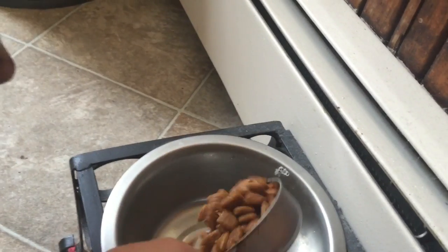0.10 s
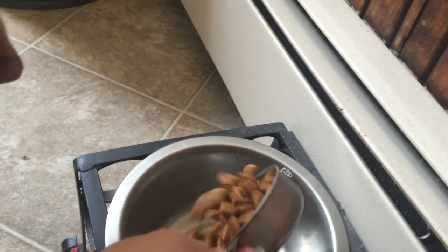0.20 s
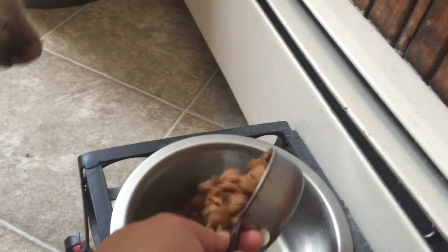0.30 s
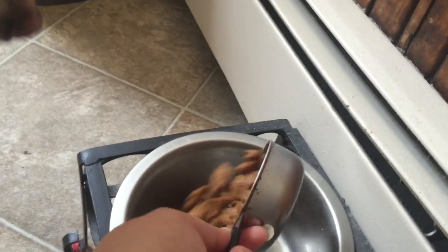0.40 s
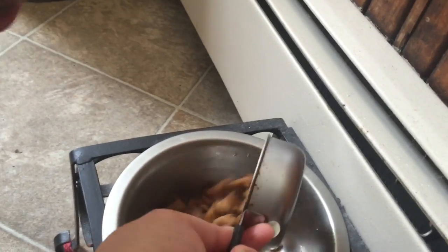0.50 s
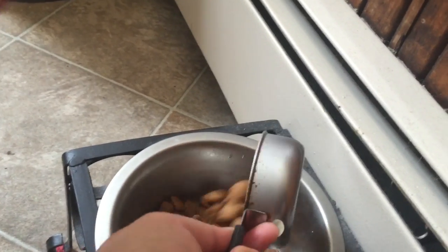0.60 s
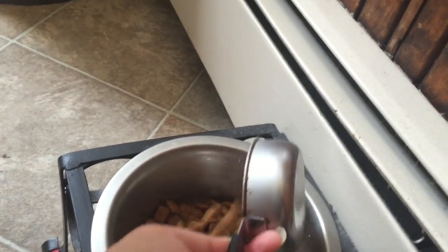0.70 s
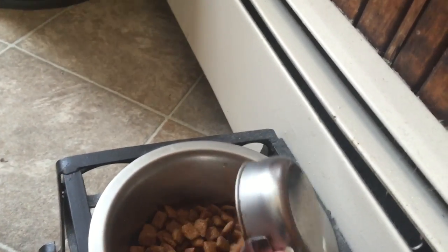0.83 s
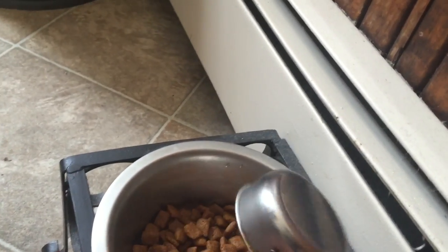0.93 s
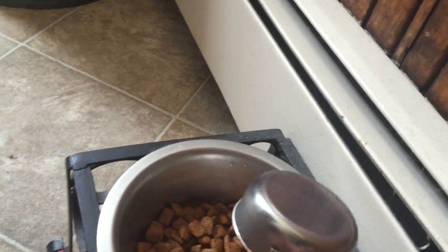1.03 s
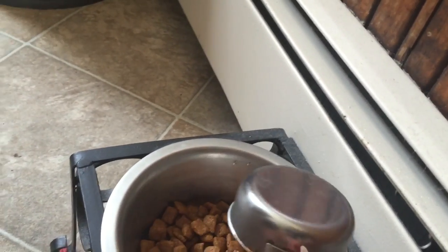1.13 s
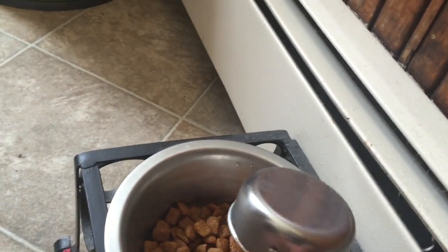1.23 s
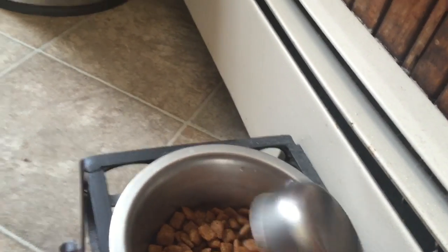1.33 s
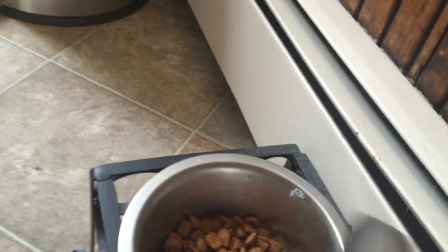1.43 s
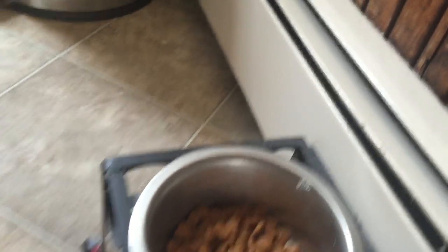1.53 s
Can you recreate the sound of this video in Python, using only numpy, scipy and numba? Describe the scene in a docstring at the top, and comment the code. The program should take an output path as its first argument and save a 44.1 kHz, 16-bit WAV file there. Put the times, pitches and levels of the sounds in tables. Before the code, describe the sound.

Dry kibble pours into a steel bowl, heard close in a quiet kitchen with low appliance hum. After a faint shift at 0.15 s, hard pieces strike bare metal from 0.22 s, ringing brightly. By 0.7 s the ring is damped and dry clatter on the heap dominates, thinning by 1.1 s. The cup ticks at 1.11 s, soft brushing lasts to 1.3 s, then a tiny metal jingle near 1.4 s.

```python
"""Kibble poured into a steel bowl

Dry kibble is tipped from a metal cup into a steel bowl in a quiet kitchen. The first pieces ring the
bare bowl (decaying modes); as the heap grows the ring is damped and pieces clatter on pieces (many
short rings). Then the cup ticks, something brushes (shaped noise and ringing grains) and a small metal
thing jingles (short modes). An appliance hums (two sine tones) over soft room noise."""
import sys
import numpy as np
from scipy import signal
from scipy.fft import rfft, irfft
from scipy.io import wavfile
from scipy.ndimage import uniform_filter1d, minimum_filter1d
from numba import njit

SR = 44100
rng = np.random.default_rng(int(sys.argv[2]) if len(sys.argv) > 2 else 0)


def amplitude_ratio(level_db):
    """Convert a level in decibels to the matching linear amplitude (field) ratio."""
    exponent = np.asarray(level_db, float) / 20
    return 10 ** exponent


def store_wav(level_fs):
    """Save 16-bit WAV to argv[1]."""
    pcm = np.round(np.clip(np.atleast_2d(level_fs), -1, 1) * 32767)
    wavfile.write(sys.argv[1], SR, pcm.T.astype(np.int16))


N = 70560   # length in samples (1.6 s)

# Levels in the tables are relative: each source adds its own offsets.


def at(points, hz):
    """Reads a level at hz from a curve, straight over log frequency."""
    f, db = np.transpose(points)
    return np.interp(np.log(hz), np.log(f), db)


def in_time(rows):
    """Turns rows of (time, values) into one smooth curve per value, sample by sample."""
    s, *cols = np.transpose(rows)
    return [np.interp(np.arange(N) / SR, s, c) for c in cols]


def coloured(points):
    """Noise with the given spectrum, scaled to rms 1."""
    hz = np.maximum(np.arange(N // 2 + 1) * SR / N, 5)
    out = irfft(rfft(rng.standard_normal(N)) * amplitude_ratio(at(points, hz)), N)
    return out / out.std()


@njit
def modes(index, gains, turn, loss, damping, n):
    """Each mode is a rotating, shrinking arrow; every hit pushes every mode."""
    out = np.zeros(n)
    for m in range(len(turn)):
        z, h, rot = 0j, 0, 0j
        for i in range(index[0], n):
            if i % 64 == 0 or i == index[0]:   # follow the damping every 64 samples
                rot = np.exp(1j * turn[m] - loss[m] * damping[i])
                if h == len(index) and abs(z) < 1e-6:
                    break   # no hits left and the ring has died away
            while h < len(index) and index[h] == i:
                z += gains[h, m]
                h += 1
            out[i] += z.imag
            z *= rot
    return out


SPOT_DB = 5.5   # usual spread of mode levels from hit to hit


def strike(s, db, hz, t60, damping=None, spot_db=SPOT_DB):
    """Rings modes with hits at times s, dB per hit and mode; each hit lands on another spot."""
    spot = spot_db * rng.standard_normal(db.shape)
    gains = amplitude_ratio(db + spot) * rng.choice([-1., 1.], db.shape)
    order = np.argsort(s)
    index = (s[order] * SR).astype(np.int64)
    loss = np.log(1000) / (t60 * SR)   # t60: seconds to fall by 60 dB
    damping = np.ones(N) if damping is None else damping
    return modes(index, gains[order], 2 * np.pi * hz / SR, loss, damping, N)


RAIN_START_S, RAIN_END_S = .2215, 1.3
SIZE_DB = 3.5   # added per unit of random piece size


def rain(rate, db):
    """Random hits, rate per second: their times, and levels that follow a curve plus piece size."""
    t = np.arange(N) / SR
    i = np.flatnonzero((rng.random(N) < rate / SR) & (t > RAIN_START_S) & (t < RAIN_END_S))
    size = np.minimum(rng.exponential(1, N), 4)[i]
    return i / SR, db[i] + SIZE_DB * size


# Spectrum of the room noise: pitch_hz [Hz], level_db [dB]
FLOOR_COLOUR = [(35, -22.5), (62, -1.5), (130, -11.5), (241, -23.5), (700, -38.5), (1700, -32.5),
                (4300, -43), (11100, -50), (16000, -60.5)]
FLOOR_DB = -50.5
# Tones of the appliance hum: pitch_hz [Hz], level_db [dB]
HUM_TONES = [(59., -59.5), (117, -53.5)]


def background():
    """Steady coloured room noise, and sine tones for the appliance hum."""
    t = np.arange(N) / SR
    hum = sum(amplitude_ratio(db) * np.sin(2 * np.pi * hz * t) for hz, db in HUM_TONES)
    return amplitude_ratio(FLOOR_DB) * coloured(FLOOR_COLOUR) + hum


ROOM_T60_S, ROOM_DB, WALL_HZ = .3, -17.5, 6800


def room(x):
    """Echoes as a fading noise tail, starting after 4 ms and dulled above WALL_HZ."""
    t = np.arange(int(.4 * SR)) / SR
    tail = rng.standard_normal(len(t)) * amplitude_ratio(-60 * t / ROOM_T60_S) * (t > .004)
    tail = signal.sosfilt(signal.butter(1, WALL_HZ, fs=SR, output="sos"), tail)
    tail = tail / np.sqrt(np.sum(tail ** 2))
    return signal.fftconvolve(x, tail)[:N] * amplitude_ratio(ROOM_DB)


THUD_DB, THUD_HZ = -38, 169.3   # relative level; top of the thud's band


def thud(heap_db):
    """Low narrow-band noise that follows half the heap's level in dB."""
    band = signal.butter(2, [THUD_HZ * 0.84, THUD_HZ], "band", fs=SR, output="sos")
    boom = signal.sosfilt(band, rng.standard_normal(N))
    return amplitude_ratio(THUD_DB + heap_db / 2) * boom / boom.std()


def taps(hits, body, click_db, click_s=0.048):
    """Light taps ring a small metal body; short high rings add a dry click to each tap."""
    s, db = np.transpose(hits)
    hz, level, t60 = np.transpose(body)
    dry_hz = np.geomspace(5500, 15800, num=30)
    table = db[:, None] + np.r_[level, 0 * dry_hz + click_db]
    return strike(s, table, np.r_[hz, dry_hz], np.r_[t60, 0 * dry_hz + click_s], spot_db=3.0)


# Modes of the small metal thing: pitch_hz [Hz], level_db [dB], t60_s [s]
JINGLE_MODES = [(5940, -10.5, 0.037), (9150, -5.5, 0.025), (11030, 3, 0.044), (13150, -9.5, .12),
                (14800, -12, .05)]
# Its taps: start_s [s], level_db [dB]
JINGLE_TAPS = [(1.3901, -45), (1.395, -41.5), (1.411, -51), (1.4355, -51), (1.440, -49), (1.5687, -62)]


def jingle():
    """A small metal thing is tapped: very short, high rings."""
    return taps(JINGLE_TAPS, JINGLE_MODES, click_db=-18.5)


# Modes of the metal cup: pitch_hz [Hz], level_db [dB], t60_s [s]
CUP_MODES = [(4274, -24, .25), (5819, -16, .35), (6218, -22, .45), (6896, -13, .2), (8333, -25, .5),
             (9534, -6, .08), (11920, -14, .08)]
# Ticks of the cup: start_s [s], level_db [dB]
TICKS = [(1.1135, -24), (1.1175, -31.5)]


def cup_ticks():
    """Light ticks set the cup's own modes ringing."""
    return taps(TICKS, CUP_MODES, click_db=-10)


# Loudness of the brushing over time: time_s [s], level_db [dB]
BRUSH_LEVEL = [(1.12, -45), (1.16, -46.5), (1.21, -50), (1.245, -41.5), (1.27, -44), (1.295, -69),
               (1.4, -78.5)]
# Spectrum of the brushing noise: pitch_hz [Hz], level_db [dB per Hz]
BRUSH_SPECTRUM = [(180, -43), (300, -3.5), (550, -7.5), (3640, -16), (7200, -5), (16000, -32.5)]
# Rings of the grains in the brushing: pitch_hz [Hz], level_db [dB], t60_s [s]
GRAIN_MODES = [(1400, -16, .03), (4000, -15, .04)]
GRAINS_PER_S, GRAIN_CUP_DB = 150, -10   # the second: how weakly grains stir the cup


def brush():
    """Soft noise with random grains that ring briefly and stir the cup's modes."""
    started = np.arange(N) > BRUSH_LEVEL[0][0] * SR
    db = np.where(started, in_time(BRUSH_LEVEL)[0], -120)
    s, size = rain(GRAINS_PER_S, db)
    stirred_cup = [(f, d + GRAIN_CUP_DB, t) for f, d, t in CUP_MODES]
    hz, level, t60 = np.transpose(GRAIN_MODES + stirred_cup)
    grains = strike(s, size[:, None] + level, hz, t60)
    return amplitude_ratio(db) * coloured(BRUSH_SPECTRUM) + grains


# The stream of pieces: time_s [s], on_steel_db [dB], on_heap_db [dB]
POUR = [(.222, -48, -17.5), (.3, -22.5, -26), (.36, -13, -14), (.44, -20, -29.5), (.49, -26.5, -19.5),
        (.54, -15.5, -20.5), (.66, -26, -17), (.70, -41, -26), (.78, -40.5, -25), (.86, -18, -21),
        (.91, -37, -27), (1.0, -60, -23.5), (1.08, -32.5, -30.5), (1.11, -55, -38.5), (1.2, -80.5, -89)]


def pour_levels():
    """How strongly the stream hits the steel and the heap, sample by sample."""
    return in_time(POUR)


# Colour of pieces knocking pieces: pitch_hz [Hz], level_db [dB per Hz]
CLATTER_COLOUR = [(150, -55), (250, -19), (790, 2), (1610, -12.5), (1790, -6.5), (3580, -15.5), (6140, -13),
                  (14200, -24), (16000, -20.5)]
# Lumps landing on the heap: start_s [s], level_db [dB], extra_treble_db [dB]
HEAP_LUMPS = [(0.844, -2, 4.5), (0.922, -1.5, -13.5), (0.940, -2.5, -3.5), (0.973, -4, 0.5),
              (0.988, -5, 4.5), (1.003, -8, -30), (1.033, -7.5, -2.5), (1.066, -11, 4.5)]
# Pieces shifting in the cup: start_s [s], level_db [dB]
CUP_SHIFTS = [(.140, -51.5), (.155, -38)]
# Clear blows on the steel, also rung by bowl(): start_s [s], level_db [dB]
STEEL_BLOWS = [(.2215, -5.5), (0.2507, -6.5), (.292, -5.5), (0.336, -8), (.352, -5), (.366, -13.5),
               (.412, -9), (.506, -8), (.528, -11), (.709, -12), (.721, -17)]
HEAP_PER_S, KNOCKS = 2500, 14   # hits per second on the heap; knocks in each lump
LUMP_S, LUMP_FADE_DB = .015, 9.5   # longest possible lump and its fade over that time
CLATTER_CYCLES, CLATTER_S = 11, 0.014   # t60 of a knock: this many cycles plus this time
HOLLOW_DB = -7   # the heap's body under 1.2 kHz is weaker while the bowl is still bare
CRACK_DB = -1.5   # dry crack in each blow


def clatter(heap_db):
    """Hard pieces knock each other: short rings over all pitches; lumps are bursts of knocks."""
    hz = np.geomspace(330, 15800, num=44)
    colour = at(CLATTER_COLOUR, hz) + 20 * np.log10(hz / 1000) - 24.5

    s, db = rain(HEAP_PER_S, heap_db)
    bare = np.clip(2 - 2.5 * s, 0, 1)   # full until 0.4 s, gone by 0.8 s
    stream = db[:, None] + HOLLOW_DB * np.outer(bare, hz < 1200)

    lump_s, lump_db, treble = np.transpose(HEAP_LUMPS)
    late = np.sort(rng.random((len(lump_s), KNOCKS)), axis=1) ** 2   # knocks crowd at the start
    late -= late[:, :1]
    knock_s = (lump_s[:, None] + LUMP_S * late).ravel()
    knock_db = (lump_db[:, None] - 3.5 - LUMP_FADE_DB * late).ravel()
    lumps = knock_db[:, None] + np.repeat(treble, KNOCKS)[:, None] * (hz > 1300)

    shift_s, shift_db = np.transpose(CUP_SHIFTS)
    shifts = shift_db[:, None] + 16 - 25 * ((hz < 1300) | (hz > 9000))   # mostly middle pitches
    blow_s, blow_db = np.transpose(STEEL_BLOWS)
    cracks = blow_db[:, None] + CRACK_DB + 0 * hz

    times = np.r_[s, knock_s, shift_s, blow_s]
    table = np.r_[stream, lumps, shifts, cracks] + colour
    return strike(times, table, hz, CLATTER_CYCLES / hz + CLATTER_S, spot_db=4.5)


# Strong modes of the bowl: pitch_hz [Hz], level_db [dB]
BOWL_MODES = [(883, -22), (937, -31.5), (1828, -32.5), (1950, -35), (2288, -41.5), (2697, -35.5),
              (3042, -26.5), (3095, -30), (4151, -38), (4840, -30.5), (5394, -33.5), (5561, -28.5),
              (5686, -36), (5802, -28), (6144, -26.5), (6185, -36.5), (6950, -34.5), (7564, -32),
              (8446, -35.5), (9528, -35), (11070, -39), (12155, -35.5), (14500, -40.5)]
# Colour of the many weak modes between: pitch_hz [Hz], level_db [dB]
WEAK_COLOUR = [(404, -40), (885, -9.5), (1430, -18.5), (5570, -8.5), (16000, -16)]
# Deepest modes, set going by one heavy piece: pitch_hz [Hz], level_db [dB], t60_s [s] before damping
DEEP_MODES = [(413, -23.5, 2.1), (675, -27, .7)]
# Late pieces on the bare rim: start_s [s], level_db [dB]
RIM_HITS = [(.819, -7), (0.845, -15.5)]
# Damping by the growing heap: time_s [s], factor on the speed of decay [none]
HEAP_DAMPING = [(.2, 1.0), (.5, 1.3), (.7, 2.2), (.9, 3.2)]
HEAVY_S, STEEL_PER_S = .2505, 450   # time of the heavy piece; stream hits per second
RIM_HZ = 3080   # rim pieces ring only modes near this and its double
# ring times before damping by the heap
BOWL_T60_S, T60_FALL = .7, .48   # t60 at 1 kHz, and the power by which it shortens with pitch
PAIR_T60_S, WEAK_T60_S = .28, 0.22   # the first two modes in BOWL_MODES, near 900 Hz, ring shorter
NEIGHBOUR_SPREAD, NEIGHBOUR_DB, NEIGHBOUR_DB_PER_OCT = .04, -14, 3   # level against the mode, at 3 kHz
LIGHT_DB_PER_OCT = 3   # small pieces favour high modes


def bowl(steel_db):
    """Blows and the stream ring the bowl's strong, neighbouring and weak modes, damped by the heap."""
    strong_hz, strong_db = np.transpose(BOWL_MODES)
    # each mode above 1.5 kHz has three weaker ones close by
    high = strong_hz > 1500
    detune = 1 + NEIGHBOUR_SPREAD * rng.standard_normal((3, high.sum()))
    close_hz = (strong_hz[high] * detune).ravel()
    close_db = np.tile(strong_db[high], 3) + NEIGHBOUR_DB + NEIGHBOUR_DB_PER_OCT * np.log2(close_hz / 3000)
    weak_hz = np.geomspace(450, 16000, num=50) * rng.uniform(.96, 1, size=50)
    weak_db = at(WEAK_COLOUR, weak_hz) - 19

    ring_hz = np.r_[strong_hz, close_hz]
    t60 = np.r_[BOWL_T60_S * (ring_hz / 1000) ** -T60_FALL, np.full(len(weak_hz), WEAK_T60_S)]
    t60[:2] = PAIR_T60_S
    hz = np.r_[ring_hz, weak_hz]
    db = np.r_[strong_db + 12, close_db + 12, weak_db]
    db = db - 10 * np.log10(t60 * 2)   # long rings gather more hits

    damping, = in_time(HEAP_DAMPING)
    blow_s, blow_db = np.transpose(STEEL_BLOWS)
    blows = strike(blow_s, blow_db[:, None] + db, hz, t60, damping, spot_db=4.0)

    rim_s, rim_db = np.transpose(RIM_HITS)
    rim = (abs(hz / RIM_HZ - 1) < .02) | (abs(hz / RIM_HZ - 2) < .04)
    rim_ring = strike(rim_s, rim_db[:, None] + db[rim], hz[rim], t60[rim], damping, spot_db=2.5)

    deep_hz, deep_db, deep_t60 = np.transpose(DEEP_MODES)
    deep = strike(np.array([HEAVY_S]), deep_db[None], deep_hz, deep_t60, damping, spot_db=1)

    s, level = rain(STEEL_PER_S, steel_db)
    light_db = db - 10 + LIGHT_DB_PER_OCT * np.log2(hz / 3000)
    stream = strike(s, level[:, None] + light_db, hz, t60, damping)
    return blows + rim_ring + deep + stream


BODY_CUT_HZ = 350   # the struck and brushed sources keep only what lies above


def scene():
    """All sources in the room."""
    steel_db, heap_db = pour_levels()
    near = bowl(steel_db) + clatter(heap_db) + cup_ticks() + jingle() + brush()
    near = signal.sosfilt(signal.butter(6, BODY_CUT_HZ, "high", fs=SR, output="sos"), near)
    return (near + room(near) + thud(heap_db) + background())[None]


def low_pass(x):
    """Removes everything above the highest recorded frequency."""
    return signal.sosfilt(signal.butter(12, 16560, fs=SR, output="sos"), x)


TOP_CUT_HZ = 16150
LIMIT, LIMIT_SAMPLES = .95, 89   # peak ceiling (full scale is 1), smoothing length


def record(dry):
    """The top is cut steeply and a fast limiter holds the peaks."""
    cut = signal.sosfilt(signal.cheby2(18, 70, TOP_CUT_HZ, fs=SR, output="sos"), dry)
    need = np.minimum(1, LIMIT / (np.abs(cut) + 1e-9))
    gain = uniform_filter1d(minimum_filter1d(need, 2 * LIMIT_SAMPLES), LIMIT_SAMPLES)
    return low_pass(cut * gain)


dry = scene()
out = record(dry)
store_wav(out)
```